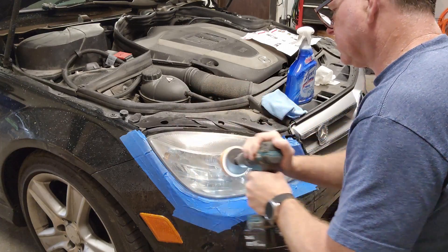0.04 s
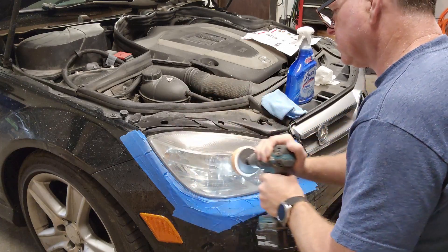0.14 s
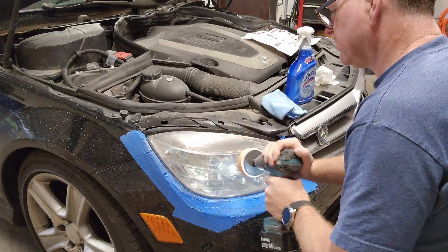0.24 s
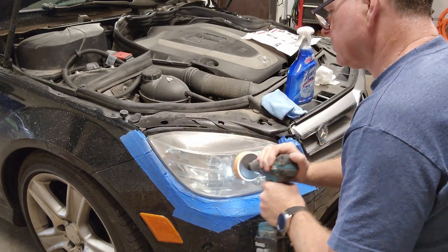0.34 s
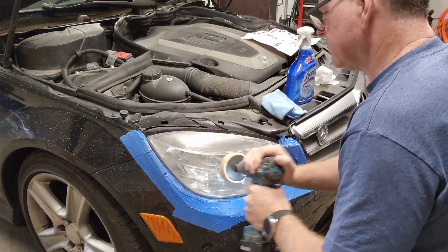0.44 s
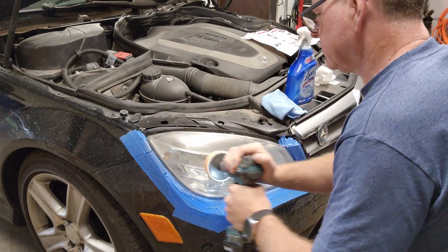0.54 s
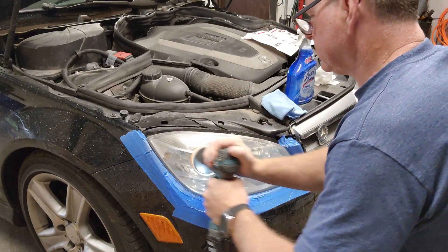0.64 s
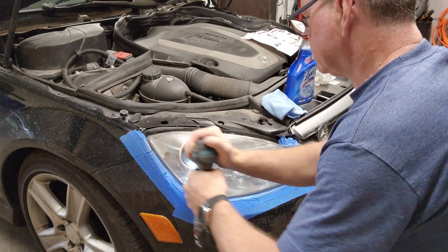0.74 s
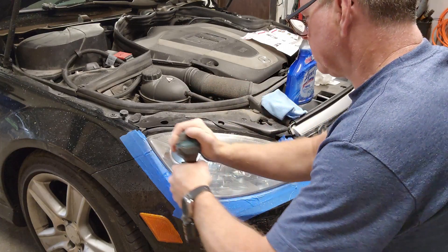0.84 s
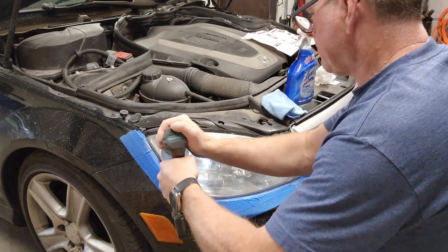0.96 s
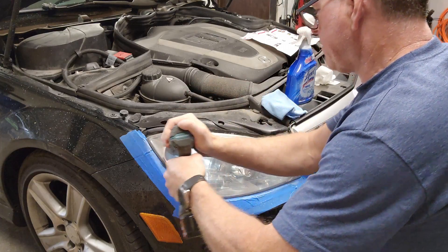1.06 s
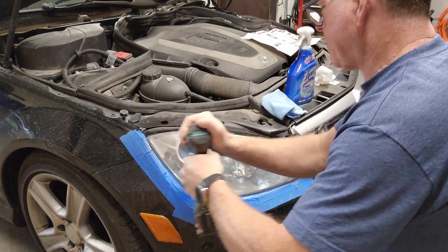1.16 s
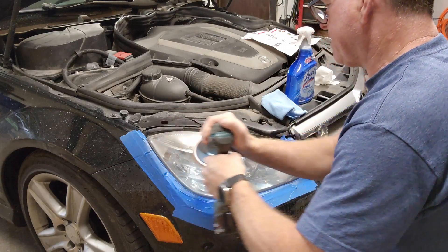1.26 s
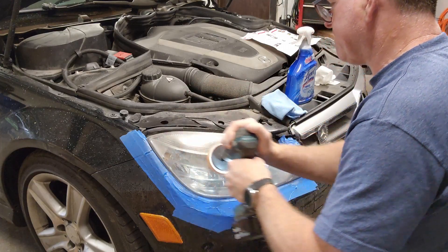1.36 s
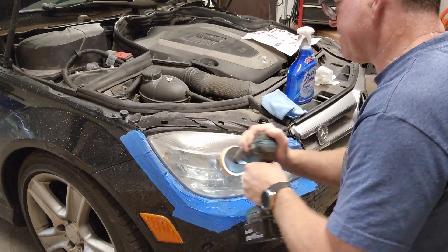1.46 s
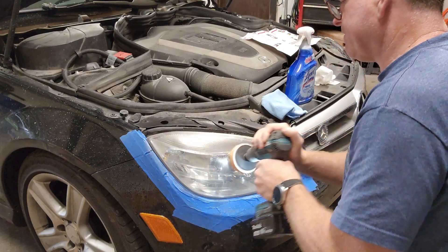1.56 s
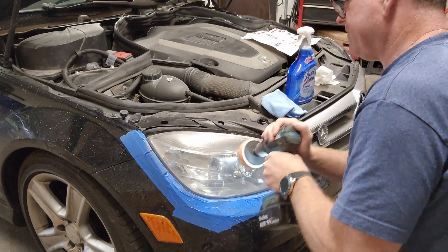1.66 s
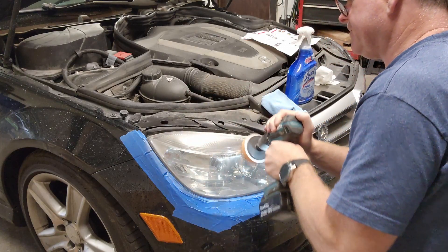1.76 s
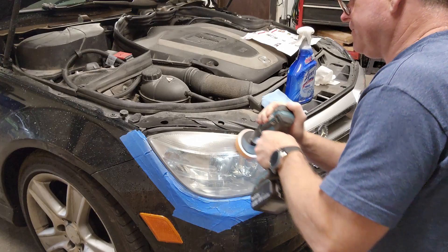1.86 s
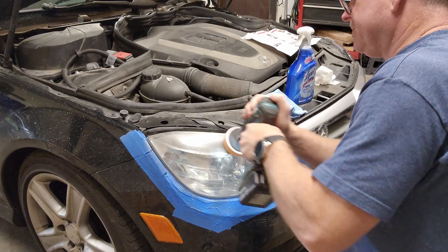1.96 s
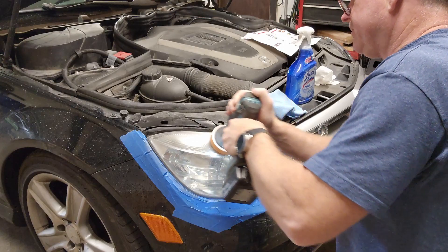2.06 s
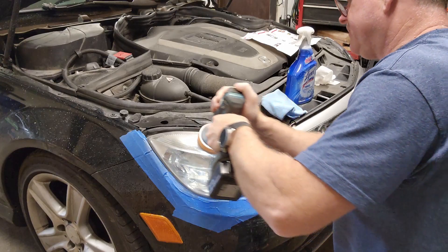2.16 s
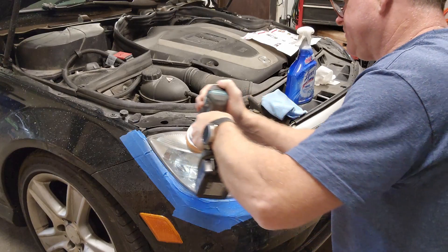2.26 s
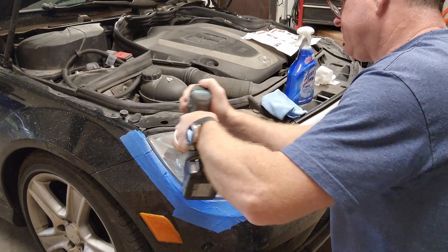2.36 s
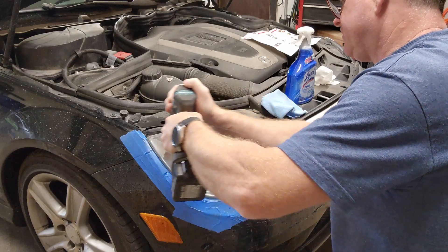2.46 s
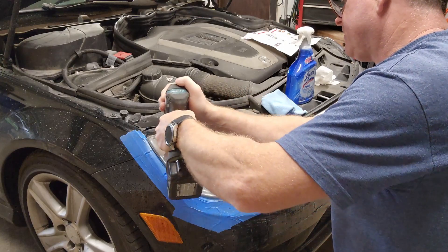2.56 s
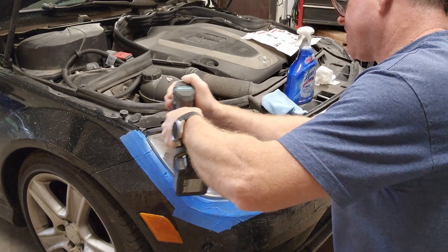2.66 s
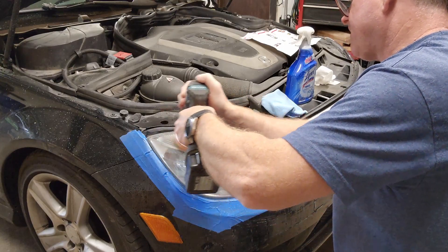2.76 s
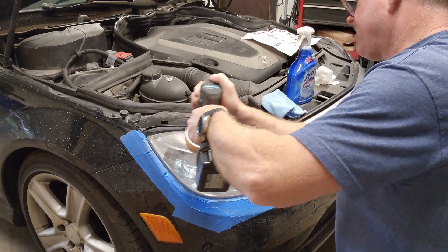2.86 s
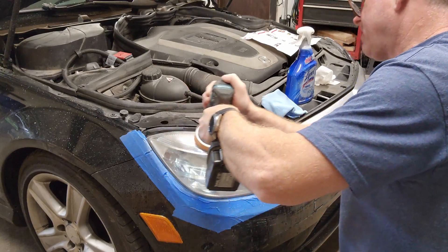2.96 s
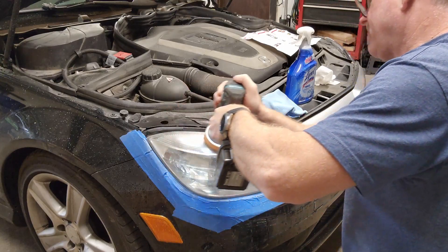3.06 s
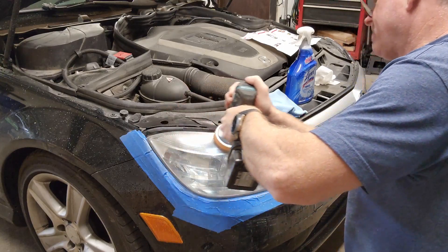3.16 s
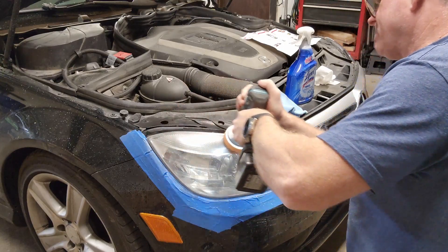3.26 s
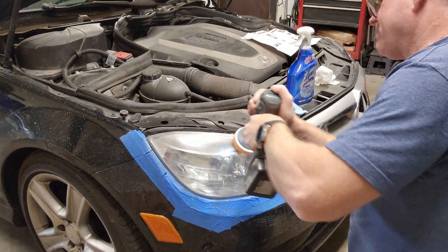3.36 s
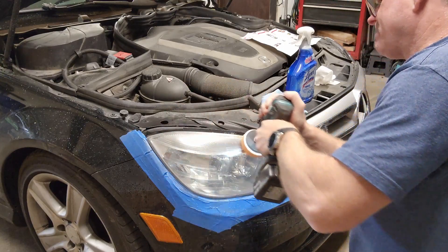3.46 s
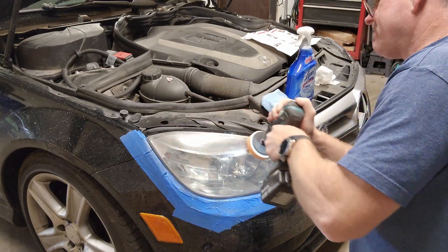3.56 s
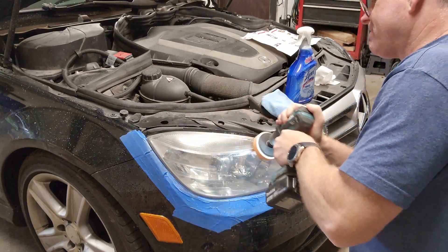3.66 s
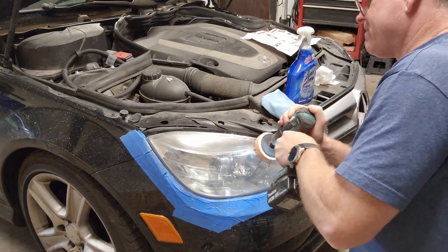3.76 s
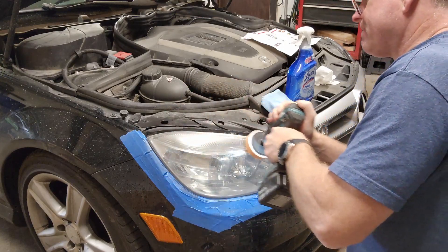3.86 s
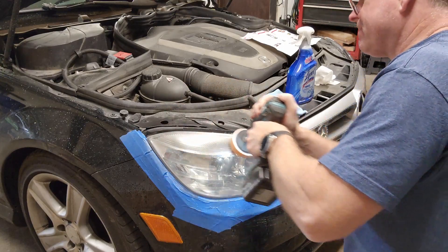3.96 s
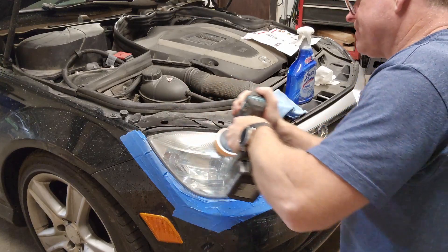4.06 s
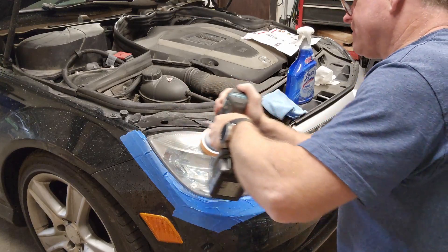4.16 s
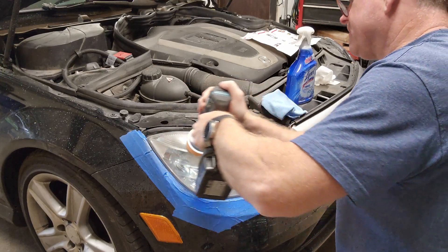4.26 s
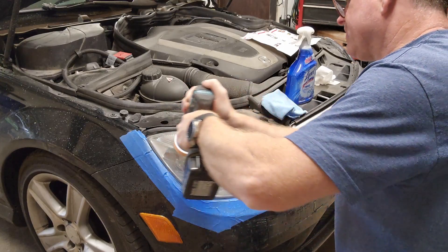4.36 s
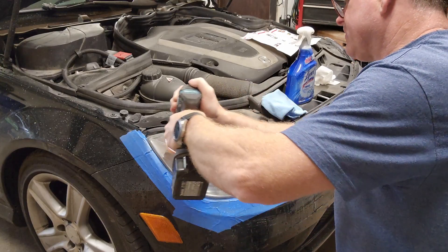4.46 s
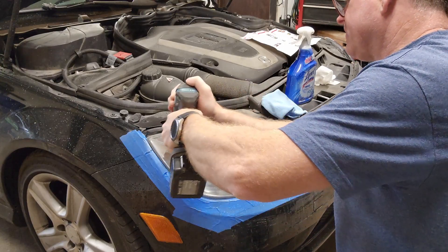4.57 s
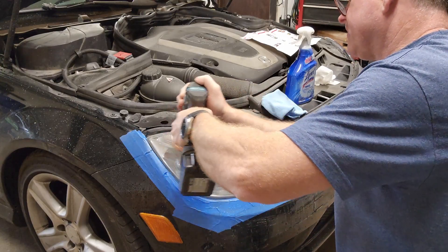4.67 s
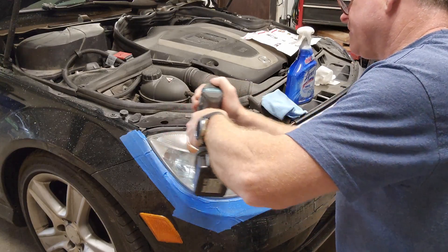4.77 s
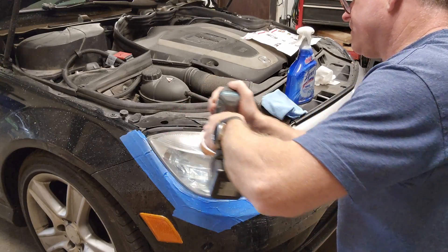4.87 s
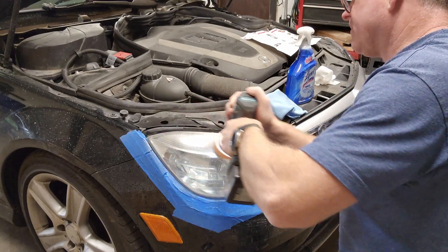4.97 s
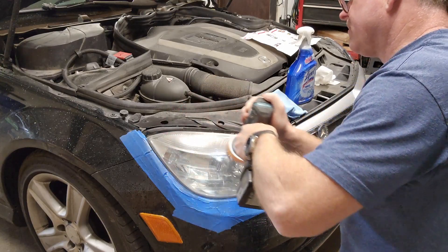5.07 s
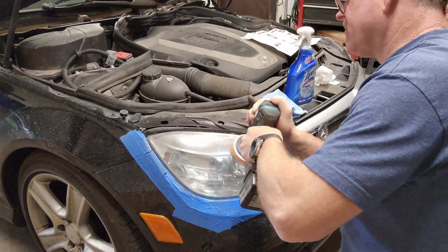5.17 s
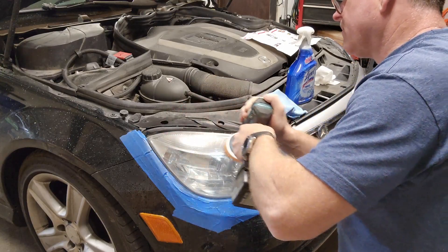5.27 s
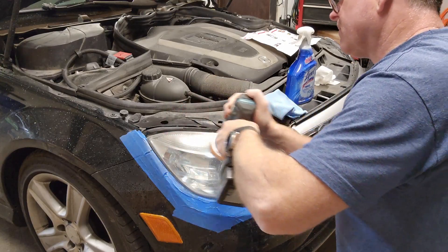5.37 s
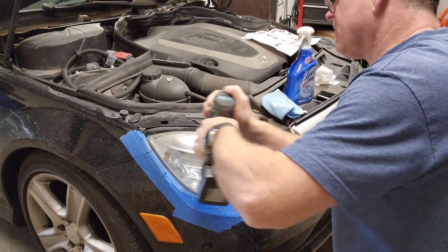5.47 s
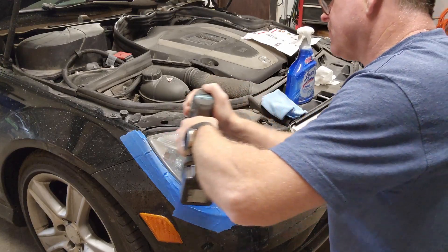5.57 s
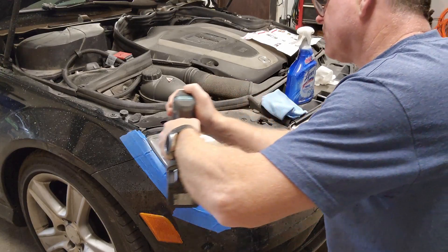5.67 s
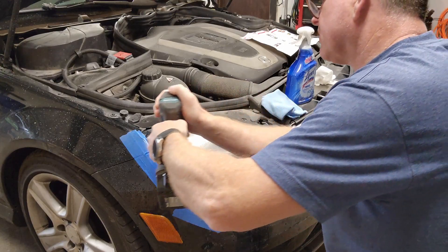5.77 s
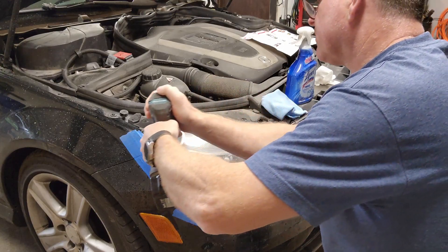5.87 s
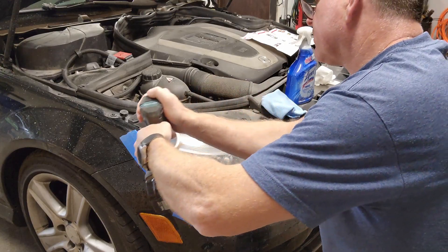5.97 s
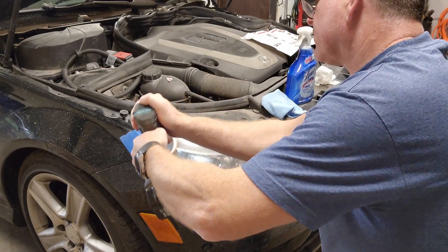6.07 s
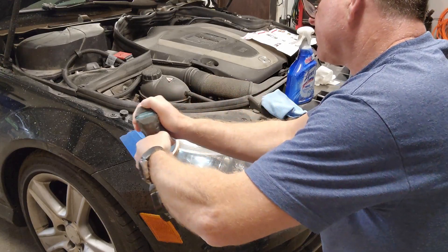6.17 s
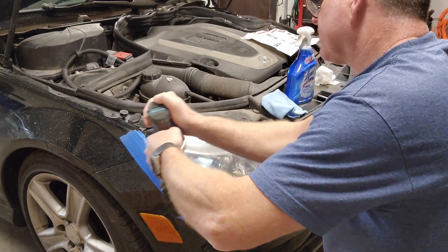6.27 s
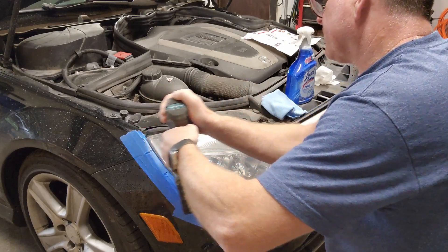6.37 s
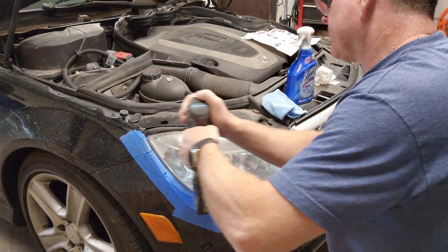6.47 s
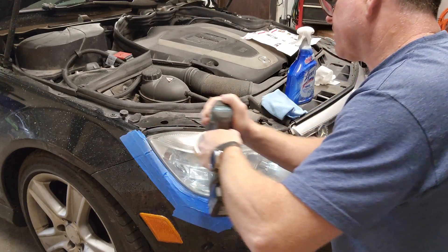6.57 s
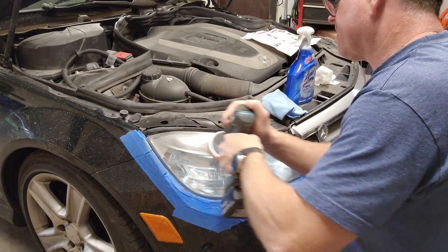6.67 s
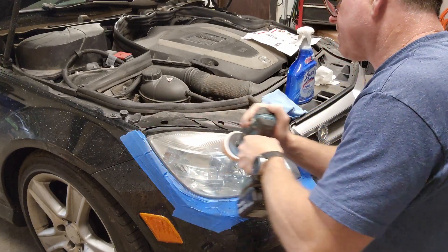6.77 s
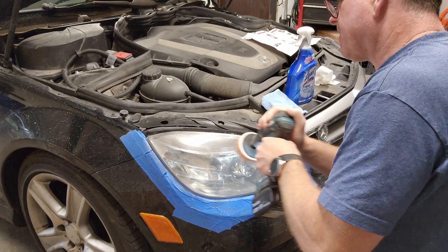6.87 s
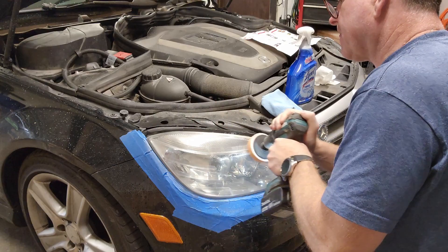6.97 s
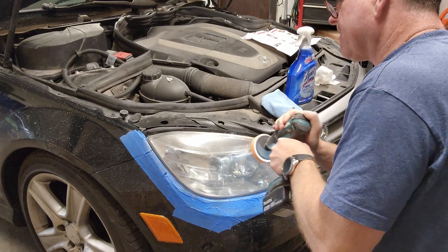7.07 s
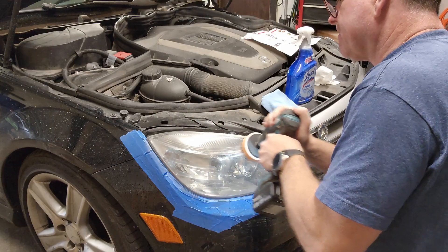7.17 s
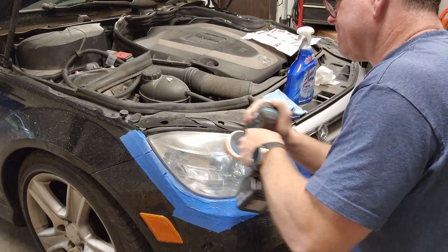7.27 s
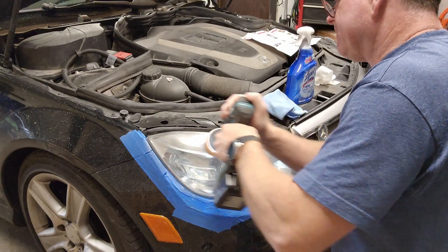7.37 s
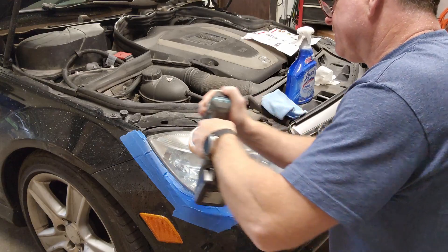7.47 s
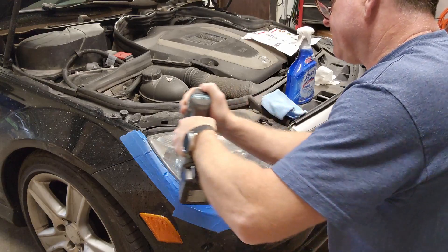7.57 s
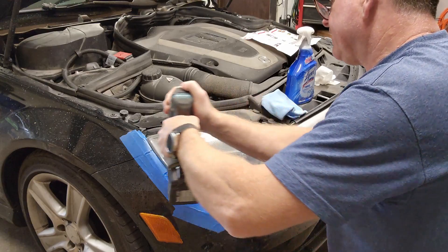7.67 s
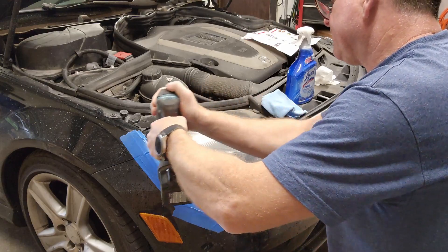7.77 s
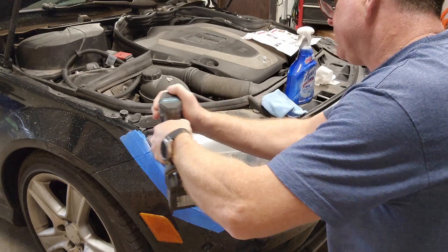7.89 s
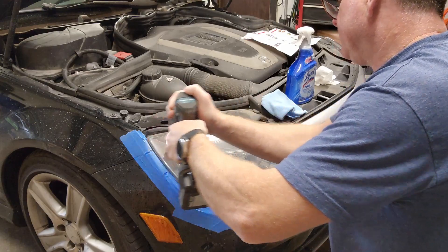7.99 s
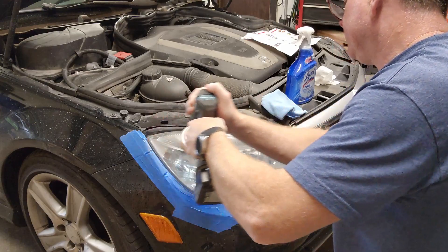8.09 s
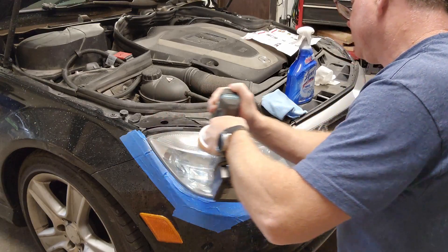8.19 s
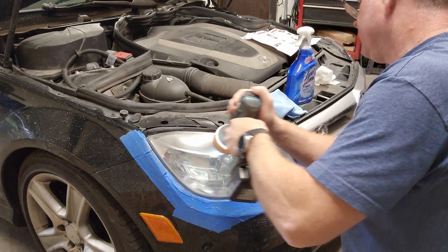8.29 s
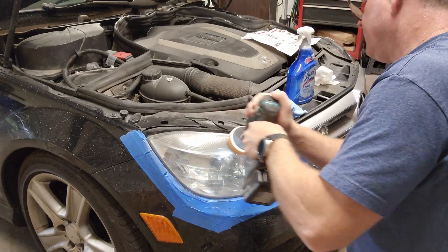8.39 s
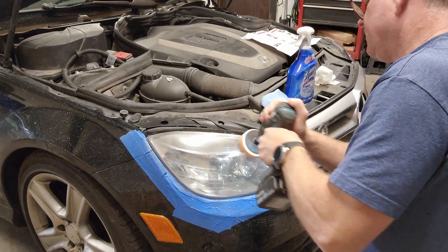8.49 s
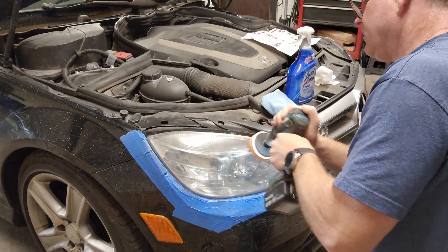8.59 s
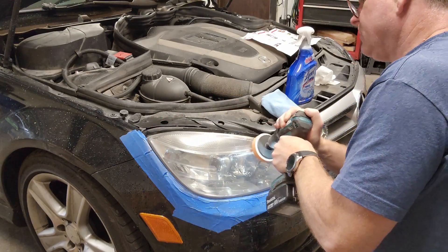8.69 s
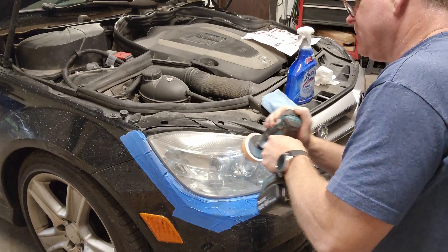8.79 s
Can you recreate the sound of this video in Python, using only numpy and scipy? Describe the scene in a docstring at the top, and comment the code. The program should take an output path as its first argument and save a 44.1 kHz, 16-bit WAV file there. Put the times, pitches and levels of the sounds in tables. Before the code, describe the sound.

A cordless drill whines steadily as its foam pad polishes a plastic headlight, with a swelling gear rattle and brief faint squeals.

```python
"""In a garage, a cordless drill spins a foam pad over a plastic headlight lens, swept to and fro.
Motor and planetary gears whine at fixed multiples of one shaft speed, and the pad throbs on the lens.
Tooth impacts and fan air rush through the housing; friction rings its modes and makes the pad squeal.
The rattle swells as the tool faces the microphones and reaches the right one later at the far end
of each sweep. Near surfaces reflect it, and the room adds a short reverberation."""
import sys
import numpy as np
from scipy import signal
from scipy.fft import rfft, irfft, next_fast_len
from scipy.io import wavfile
from scipy.ndimage import uniform_filter1d, map_coordinates

SR = 44100
rng = np.random.default_rng(int(sys.argv[2]) if len(sys.argv) > 2 else 0)


def master_out(mix):
    """Clip the mix to full scale and print it as 16-bit PCM to the path in sys.argv[1]."""
    frames = np.transpose(np.atleast_2d(mix))
    ceiling = np.clip(frames, -1, 1)
    pcm = np.round(ceiling * 32767).astype(np.int16)
    wavfile.write(sys.argv[1], SR, pcm)


N = 389403
PAD_RATIO = 1 / 16   # pad turns per shaft turn


def amp(db):
    """Decibels to amplitude ratio."""
    return 10 ** (np.asarray(db) / 20)


def rms_one(x):
    """Normalisation to unit rms."""
    return x / np.sqrt(np.mean(x ** 2) + 1e-20)


def in_time(rows):
    """Linear interpolation: one curve for each column after the time."""
    times, *columns = np.transpose(rows)
    return np.array([np.interp(np.arange(N) / SR, times, column) for column in columns])


def at_hz(points, hz):
    """Interpolation of a spectrum on a logarithmic frequency axis."""
    frequencies, levels = np.transpose(points)
    return np.interp(np.log(hz), np.log(frequencies), levels)


def drift(rate_hz, spread_db=None):
    """Random modulation: low-passed noise of unit rms, or a flickering gain if spread_db is given."""
    step, settle = 40, 2000
    r = np.exp(-2 * np.pi * rate_hz * step / SR)
    white = rng.standard_normal(N // step + settle + 2)
    slow = rms_one(signal.lfilter([1], [1, -2 * r, r * r], white)[settle:])
    if spread_db is not None:
        slow = amp(spread_db * slow)
    return np.interp(np.arange(N) / step, np.arange(len(slow)), slow)


def peaked(x, modes):
    """Resonances and antiresonances as second-order filters in cascade."""
    for hz, width_hz, db in modes:
        a, w = amp(db / 2), 2 * np.pi * hz / SR
        q, middle = np.sin(w) * width_hz / hz / 2, -2 * np.cos(w)
        x = signal.lfilter([1 + q * a, middle, 1 - q * a], [1 + q / a, middle, 1 - q / a], x)
    return x


def shaft_tones(turns, lines, flutter_db):
    """Rotational orders: sines at multiples of shaft speed, the higher ones wavering more in phase."""
    out, waver_rad = 0, .045 * drift(20)
    for order, gain in lines:
        phase = 2 * np.pi * (order * turns + rng.random()) + order ** .7 * waver_rad
        out = out + np.sqrt(2) * gain * drift(15.6, flutter_db) * np.sin(phase)
    return out


def rumble(cutoff_hz=45, level_db=-71.5):
    """Low background noise, partly coherent between left and right."""
    mid, side = signal.sosfilt(signal.butter(2, cutoff_hz, fs=SR, output="sos"), rng.normal(size=(2, N)))
    return amp(level_db) * rms_one(mid + amp(-4) * side * [[1], [-1]])


# Response of the reverberant field: frequency_hz, gain_db
GARAGE_RESPONSE = [(60, 17), (250, 2), (600, 6), (1200, 6.5), (2200, 2), (4000, -2), (8000, 0.5),
                   (13000, 15)]

def garage(x, t60_s=.28):
    """Diffuse reverberation: decaying fields blend as the moving tool excites the room from new spots."""
    size, lead = next_fast_len(N + SR), SR // 2
    t, hz = np.arange(lead) / SR, np.linspace(1, SR / 2, size // 2 + 1)
    primed = np.r_[x[lead:0:-1], x]   # the room is already ringing at the start
    spectrum = rfft(primed, size) * amp(at_hz(GARAGE_RESPONSE, hz))
    coherence = .94 / (1 + (hz / 700) ** 1.56)   # long waves reach both microphones alike
    weights = np.array([drift(1.55) for spot in range(5)])
    weights /= np.sqrt(np.sum(weights ** 2, axis=0))
    out = 0
    for weight in weights:
        tail = rng.standard_normal((2, lead)) * amp(-60 * t / t60_s) * (t > .012)
        mid, side = rfft(tail / np.sqrt(2 * np.sum(tail ** 2, axis=1, keepdims=True)), size)
        stereo = np.sqrt(1 + coherence) * mid + np.sqrt(1 - coherence) * side * [[1], [-1]]
        out = out + weight * irfft(spectrum * stereo, size)[:, lead:lead + N]
    return out


# Reflections from bonnet, floor, body and worker: delay_ms, slide_ms_per_ms_of_lag, gain_db
REFLECTIONS = [(1.7, 1, -32), (3.1, -6.0, -5.5), (5.3, 10, 0), (8.9, -12.0, -1.5), (13.7, 15, -3.5)]
# Sweep of the pad, as lag at the right microphone: time_s, lag_ms
PAD_LAG = [(0.0, .115), (.35, .135), (.95, 0.0), (1.15, 0.0), (1.85, .125), (2.55, .01), (2.8, .02),
           (3.85, .135), (4.65, .02), (5.25, .095), (5.75, 0.0), (6.15, -.02), (7.05, .135), (7.8, 0.0),
           (8.83, .135)]

def near_echoes(x):
    """Early reflections: their path lengths slide with the sweep and differ at each microphone."""
    lag_ms, samples, out = in_time(PAD_LAG)[0], np.arange(N), np.zeros((2, N))
    for side in range(2):
        for delay_ms, slide, db in REFLECTIONS:
            path_ms = delay_ms + (slide + .75 * side) * lag_ms + rng.uniform(0, .098)
            out[side] += amp(db) * np.interp(np.abs(samples - path_ms * SR / 1000), samples, x)
    return out


# Wider swing of the motor end, as lag at the right microphone: time_s, lag_ms
MOTOR_LAG = [(0.0, .15), (.4, .21), (.7, .21), (.9, .02), (1.45, .015), (1.7, .04), (1.93, .12),
             (2.2, .065), (2.68, .012), (2.93, .037), (3.2, .095), (3.43, .1), (3.6, .2), (3.93, .175),
             (4.18, .11), (4.4, .04), (4.68, .028), (5.18, .09), (5.43, .07), (5.6, .025), (6.18, -.025),
             (6.68, .065), (7.18, .15), (7.43, .07), (7.93, -.035), (8.18, .045), (8.43, .18), (8.83, .19)]

def direct_sound(pad_end, motor_end):
    """Time difference of arrival: each end of the tool has its own moving lag between left and right."""
    out = 0
    for x, lag in [(pad_end, PAD_LAG), (motor_end, MOTOR_LAG)]:
        late = np.arange(N) - in_time(lag)[0] * SR / 1000
        out = out + np.array([x, map_coordinates(x, [late], order=3, mode="mirror")])
    return out


# Squeals of the pad on the lens: centre_s, length_s, pitch_hz, glide_hz_per_s, level_db
PAD_SQUEALS = [(0.254, .14, 3930, 14, -43), (.72, 0.089, 4220, 210, -37), (1.136, 0.081, 4760, 3, -34),
               (1.148, 0.089, 4970, 495, -47), (1.114, 0.088, 3880, 1486, -43),
               (2.412, 0.38, 2250, 200, -50), (2.56, 0.2, 4270, 250, -34), (2.546, 0.24, 3784, -200, -28.5),
               (2.647, 0.11, 4900, 2, -38), (2.77, 0.072, 4500, 2, -34), (2.952, 0.24, 3580, 107, -35),
               (3.798, 0.23, 4600, -5, -36), (4.715, 0.29, 4230, 198, -52), (5.996, .3, 4780, -2, -45),
               (6.34, 0.14, 4720, 0, -32), (6.36, 0.092, 4920, 2, -38), (6.303, 0.15, 4400, 250, -39),
               (6.68, 0.27, 4490, 600, -31.5), (6.58, 0.1, 2410, 600, -41), (6.757, 0.11, 2330, -200, -39),
               (7.58, 0.16, 2550, -300, -36), (7.91, 0.12, 4290, 6, -36), (8.607, 0.4, 4750, 804, -40)]

def squeals(width_hz=45):
    """Friction-excited vibration: gliding tones, unsteady in level and phase, in Gaussian envelopes."""
    t, out = np.arange(N) / SR, np.zeros(N)
    unsteady = drift(width_hz) + 1j * drift(width_hz)
    for centre_s, length_s, hz, glide, db in PAD_SQUEALS:
        near = np.abs(t - centre_s) < 2 * length_s
        offset_s = t[near] - centre_s
        tone = np.real(unsteady[near] * np.exp(2j * np.pi * (hz + glide * offset_s / 2) * offset_s))
        out[near] += amp(db) * np.exp(-(2 * offset_s / length_s) ** 2) * tone
    return out


# Hollow modes of lens and housing: pitch_hz
HOLLOW_MODES = [1335, 1445, 1600, 1770, 2030, 2200, 2290, 2460, 2560, 2800, 3000, 3160, 3300, 3470, 3610,
                3750, 3860, 4080, 4160, 4305, 4420, 4510, 4630, 4740, 4830]
# Noise spectrum that drives the rings and the rush: frequency_hz, relative_density_db
NOISE_SPECTRUM = [(24, -64), (55, -44), (179, -29), (242, -19), (408, -18.5), (474, -16.5), (908, -23.5),
                  (1970, -8), (2660, -6.5), (3770, -2), (4960, -1), (6210, -11), (7580, -14),
                  (10800, -24.5), (15600, -31)]

def rings(housing_db, width_hz=30):
    """Modal resonance: friction noise drives narrow modes, each swelling and fading at random."""
    white, out = rng.standard_normal((2, N)), 0
    r = np.exp(-np.pi * width_hz / SR)
    for k, hz in enumerate(HOLLOW_MODES):
        mode = signal.lfilter([1, 0, -1], [1, -2 * r * np.cos(2 * np.pi * hz / SR), r * r], white[k % 2])
        out = out + amp(at_hz(NOISE_SPECTRUM, hz)) * drift(10.7, spread_db=4) * mode
    return amp(housing_db - 4.5) * rms_one(out)


# Relative levels: time_s, lens_db, low_rattle_db, housing_db, pad_rub_db, gear_case_db, case_top_db
BAND_SWELLS = [(0.0, -43, -32.5, -25.5, -33, -35, -35), (0.12, -48, -31, -31, -32, -34, -45),
               (0.22, -55, -34, -26, -30, -37, -38), (0.37, -54.5, -33.5, -32.5, -33, -31, -43),
               (0.61, -58, -30, -28.5, -32, -37, -39), (0.73, -48, -29.5, -31.5, -34.5, -38, -32),
               (0.96, -53.5, -29, -32.5, -41, -33, -42), (1.15, -54.5, -29.5, -31, -36, -31, -35),
               (1.37, -54.5, -31.5, -31.5, -39, -35, -47), (1.52, -49, -36, -34.5, -40, -38, -40),
               (1.6, -46, -31.5, -26, -35, -33, -34), (1.67, -51.5, -36.5, -30, -32, -37, -39),
               (2.09, -53.5, -30.5, -29, -32, -39, -42), (2.29, -61, -30.5, -29, -36, -33, -43),
               (2.56, -59, -36, -24, -39.5, -34.5, -35.5), (3.07, -50.5, -33, -28, -31.5, -39, -44.5),
               (3.27, -51, -34.5, -30, -38, -36, -42), (3.46, -55, -37, -29.5, -35, -37, -36),
               (3.79, -48.5, -33, -28, -31, -29, -46), (3.91, -54, -33, -27, -36, -34, -40),
               (4.03, -48, -32.5, -29.5, -31, -40, -41), (4.18, -58, -36, -26, -30, -41, -36),
               (4.33, -59, -29.5, -27.5, -29, -31, -36), (4.52, -58, -36, -27, -33, -39, -43),
               (4.62, -63, -36, -27.5, -31.5, -35, -40), (4.97, -54, -36, -27, -36, -38, -45),
               (5.14, -56.5, -35, -28.5, -30.5, -39, -38), (6.0, -60.5, -33, -27.5, -31, -32, -43.5),
               (6.22, -55, -32, -30, -31, -34, -42), (6.57, -55, -30.5, -32, -30, -36, -43),
               (6.64, -61, -32.5, -28.5, -31, -37, -45), (6.79, -57, -33.5, -31, -34, -30, -35),
               (6.86, -51, -32.5, -30, -29, -42, -42), (7.13, -49, -34.5, -29, -34, -30.5, -39),
               (7.21, -53, -32, -33, -30, -35, -44), (7.38, -60, -36, -28.5, -40, -40, -38),
               (7.6, -58.5, -32.5, -28.5, -28.5, -35.5, -42.5), (8.12, -61.5, -32.5, -29, -34.5, -33, -42),
               (8.36, -56, -30, -29.5, -37, -37, -50), (8.46, -48.5, -33.5, -33, -35, -37, -42),
               (8.71, -53.5, -35, -33, -32, -31, -41), (8.83, -53, -33, -29, -33, -33, -39)]
# Rasp of the pad: time_s, relative_level_db
RASP_SWELL = [(0.0, -34), (0.19, -35), (0.59, -34), (1.3, -34.5), (1.7, -39), (2.58, -35), (3.69, -39.5),
              (4.5, -37), (5.26, -37), (6.81, -31.5), (6.91, -42), (7.21, -30.5), (7.23, -42.5),
              (7.43, -30), (7.5, -42), (7.6, -33), (7.94, -39), (8.02, -36), (8.43, -36.5), (8.83, -32)]

def band_levels():
    """Directivity: the levels of ten noise bands, low to high, change as the tool turns."""
    lens, low_rattle, housing, rub, case, top = in_time(BAND_SWELLS)
    rasp = in_time(RASP_SWELL)[0]
    panel, vents, fan = .034 * low_rattle, -.37 * housing, -.046 * housing
    return np.array([lens, panel, low_rattle, rasp, housing, rub, case, top, vents, fan])


# The ten bands, from lens to fan: centre_hz
BAND_CENTRES = [330, 750, 2100, 2850, 3700, 4300, 4750, 5500, 6600, 13000]
# Main resonances and dips of the housing: centre_hz, width_hz, gain_db
HOUSING_MODES = [(848, 172, 8), (898, 89, -5), (1010, 157, 7), (678, 49, -4.5), (1395, 62, 2.5),
                 (1500, 150, 1), (2173, 900, 5.5), (2840, 1400, 0.5), (3822, 850, 6.5), (7660, 2260, 8)]
# Narrow peaks and valleys of the body: centre_hz, width_hz, gain_db
BODY_MODES = [(560, 90, 1.5), (790, 45, 4), (905, 45, -5), (1600, 45, 3), (1875, 60, -3), (4305, 50, 2),
              (5230, 120, -3)]

def rush(turns, bands_db, steady_db=-25.5):
    """Source and filter: tooth impacts and air as noise through the housing, swelling and steady."""
    throb = 1 + .05 * np.sin(2 * np.pi * PAD_RATIO * turns)
    grains = rng.standard_normal((2, N)) * drift(69, spread_db=1.5) * throb
    edges_hz = 25 * 2 ** np.arange(0, 9.6, 1 / 6)
    mean_db = 10 * np.log10(np.mean(amp(2 * bands_db), axis=1, keepdims=True))
    swells_db = bands_db - mean_db + .72 * drift(38)
    swelling, steady = 0, 0
    for k, (low, high) in enumerate(zip(edges_hz, edges_hz[1:])):
        hz = np.sqrt(low * high)
        bandpass = signal.butter(2, [low, high], "band", fs=SR, output="sos")
        band = amp(at_hz(NOISE_SPECTRUM, hz)) * signal.sosfilt(bandpass, grains[k % 2])
        place = np.interp(np.log(hz), np.log(BAND_CENTRES), np.arange(10))
        below = min(int(place), 8)
        swell_db = (1 - place + below) * swells_db[below] + (place - below) * swells_db[below + 1]
        depth = min(hz / 130, 1) ** 2   # the deep bass hardly swells
        swelling = swelling + band * amp(swell_db * depth) * drift(13.7, spread_db=1.5)
        steady = steady + band
    swelling, steady = peaked(np.array([swelling, steady]), HOUSING_MODES + BODY_MODES)
    gain = amp(steady_db) / np.std(steady)
    return gain * swelling, gain * steady


# Sidebands of the gears: shaft_order, level_re_housing_db
GEAR_SIDEBANDS = [(3.0, -33), (4.711, -24), (5.25, -28), (7.227, -23), (7.43, -20), (7.836, -20),
                  (9.75, -24), (12.0, -32), (16.0, -33), (20.32, -43)]

def gear_whine(turns, housing_db):
    """Gear-mesh sidebands: fluttering tones that follow the level of the housing's rattle."""
    lines = [(order, amp(housing_db + db)) for order, db in GEAR_SIDEBANDS]
    return shaft_tones(turns, lines, flutter_db=3)


# Strong throbs, loudest where the lens drums: time_s, pad_order_4_db, pad_order_8_db, pad_order_15_db
STRONG_THROBS = [(0.1, -73, -57, -57), (0.37, -60, -57, -68), (0.64, -71, -91, -62), (0.91, -68, -79, -61),
                 (1.18, -74, -72, -64), (1.45, -69, -61, -50), (1.72, -70, -57, -47), (1.99, -69, -50, -75),
                 (2.26, -69, -84, -72.0), (2.53, -72, -67, -72), (2.8, -75, -67, -84),
                 (3.07, -89, -54, -70), (3.34, -59, -51.0, -59), (3.61, -63, -57.5, -52),
                 (3.88, -62, -53, -68), (4.15, -71.0, -65, -79), (4.42, -81.0, -70, -76.0),
                 (4.69, -88, -66, -80.0), (4.96, -82, -71, -78), (5.23, -62, -54, -56),
                 (5.5, -91, -65, -81), (5.77, -86, -92, -84), (6.04, -68, -63, -76), (6.31, -102, -67, -83),
                 (6.58, -62, -74, -78.0), (6.85, -73, -60, -64), (7.12, -81, -52, -62),
                 (7.39, -69, -69, -67), (7.66, -76, -74, -70), (7.93, -77, -76, -66),
                 (8.2, -71, -64, -83.0), (8.47, -71, -52.5, -75), (8.74, -74, -57, -65)]
# Weak throbs that follow the lens band: pad_order, relative_level_db
WEAK_THROBS = [(5, -22), (6, -25), (7, -22), (9, -19), (10, -21), (11, -21), (12, -19), (14, -23),
               (17, -20), (18, -21)]

def pad_throb(turns, lens_db):
    """Forced vibration: the pad drives the lens at multiples of its own rotation rate."""
    strong = zip(PAD_RATIO * np.array([4, 8, 15]), amp(in_time(STRONG_THROBS)))
    weak = [(order * PAD_RATIO, amp(lens_db + 3.5 + db)) for order, db in WEAK_THROBS]
    return shaft_tones(turns, strong, flutter_db=1.5) + shaft_tones(turns, weak, flutter_db=4)


# Relative levels of the motor's tones: time_s, shaft_db, poles_db, pole_octave_db, mesh_db
MOTOR_LEVELS = [(0.1, -48.0, -34.0, -49.0, -45.0), (0.3, -48.0, -39.0, -39.0, -40.0),
                (0.5, -49.0, -36.0, -42.0, -38.0), (0.7, -48.0, -50.0, -42.0, -40.0),
                (0.9, -51.0, -38.0, -40.0, -34.0), (1.1, -55.0, -41.0, -38.0, -36.0),
                (1.3, -51.0, -43.0, -43.0, -43.0), (1.5, -49.0, -41.0, -48.0, -43.0),
                (1.7, -47.0, -38.0, -44.0, -45.0), (1.9, -57.0, -45.0, -42.0, -48.0),
                (2.1, -62.0, -47.0, -39.0, -43.0), (2.3, -56.0, -36.0, -37.0, -38.0),
                (2.5, -58.0, -44.0, -36.0, -32.0), (2.7, -58.0, -41.0, -33.0, -34.0),
                (2.9, -57.0, -43.0, -37.0, -32.0), (3.1, -55.0, -41.0, -34.0, -39.0),
                (3.3, -62.0, -40.0, -35.0, -41.0), (3.5, -63.0, -47.0, -36.0, -46.0),
                (3.7, -56.0, -45.0, -35.0, -36.0), (3.9, -53.0, -43.0, -37.0, -37.0),
                (4.1, -59.0, -44.0, -38.0, -36.0), (4.3, -60.0, -42.0, -32.0, -32.0),
                (4.5, -55.0, -41.0, -38.0, -36.0), (4.7, -56.0, -40.0, -35.0, -33.0),
                (4.9, -60.0, -42.0, -36.0, -35.0), (5.1, -61.0, -44.0, -36.0, -36.0),
                (5.3, -55.0, -46.0, -37.0, -34.0), (5.5, -62.0, -42.0, -37.0, -32.0),
                (5.7, -58.0, -39.0, -36.0, -35.0), (5.9, -59.0, -34.0, -36.0, -41.0),
                (6.1, -59.0, -43.0, -36.0, -37.0), (6.3, -59.0, -39.0, -38.0, -40.0),
                (6.5, -58.0, -36.0, -37.0, -38.0), (6.7, -61.0, -39.0, -39.0, -37.0),
                (6.9, -49.0, -43.0, -36.0, -42.0), (7.1, -53.0, -43.0, -40.0, -46.0),
                (7.3, -54.0, -42.0, -39.0, -45.0), (7.5, -60.0, -36.0, -38.0, -36.0),
                (7.7, -60.0, -46.0, -35.0, -37.0), (7.9, -58.0, -44.0, -32.0, -35.0),
                (8.1, -58.0, -39.0, -37.0, -41.0), (8.3, -65.0, -44.0, -35.0, -45.0),
                (8.5, -54.0, -40.0, -42.0, -44.0), (8.7, -51.0, -49.0, -48.0, -39.0)]

def motor_whine(turns, pole_order=4, mesh_order=10.562, slot_order=24):
    """Periodic forcing by shaft, poles, gear teeth and slots; the poles' octave is returned apart."""
    shaft, poles, octave, mesh = amp(in_time(MOTOR_LEVELS))
    lines = [(1, shaft), (pole_order, .8 * poles), (mesh_order, 1.15 * mesh), (slot_order, amp(-51))]
    whine = shaft_tones(turns, lines, flutter_db=1.5)
    return whine, shaft_tones(turns, [(2 * pole_order, 1.15 * octave)], flutter_db=1.5)


# Motor shaft under load: time_s, speed_turns_per_s
SHAFT_SPEED = [(0.0, 489.5), (0.08, 488.9), (0.16, 485.5), (0.32, 483.9), (0.64, 488.6), (0.8, 485.5),
               (1.04, 484.6), (1.12, 484.6), (1.28, 488.6), (1.36, 486.2), (1.52, 487.0), (1.6, 485.6),
               (1.68, 487.4), (1.76, 486.5), (1.92, 488.9), (2.32, 486.7), (2.4, 487.4), (2.64, 485.1),
               (2.72, 487.7), (2.8, 488.6), (3.04, 484.9), (3.36, 482.3), (3.68, 484.8), (3.76, 484.4),
               (3.84, 482.3), (4.08, 486.9), (4.24, 484.3), (4.48, 483.7), (4.72, 488.2), (4.8, 487.5),
               (5.04, 482.2), (5.12, 481.2), (5.2, 482.4), (5.36, 479.8), (5.68, 487.4), (5.76, 488.2),
               (6.0, 487.6), (6.16, 484.0), (6.32, 488.9), (6.4, 489.5), (6.56, 484.9), (6.64, 485.6),
               (6.88, 484.1), (7.12, 481.2), (7.28, 481.4), (7.44, 485.9), (7.6, 487.0), (7.84, 482.5),
               (7.92, 482.1), (8.0, 482.7), (8.16, 487.6), (8.24, 485.9), (8.4, 484.9), (8.64, 485.5),
               (8.72, 484.8), (8.8, 482.5)]

def shaft_turns():
    """Rotation is the integral of speed, which hunts as the pad grabs and slips."""
    hunt = .9 * drift(rate_hz=7)
    speed = in_time(SHAFT_SPEED)[0] + hunt - uniform_filter1d(hunt, size=SR // 3)
    return np.cumsum(speed) / SR


def scene():
    """Superposition of the tool's direct sound, early reflections, reverberation and low noise."""
    turns, bands_db = shaft_turns(), band_levels()
    lens_db, housing_db = bands_db[0], bands_db[4]
    motor, pole_octave = motor_whine(turns)
    pad = pad_throb(turns, lens_db) + pole_octave   # the octave radiates from the pad end
    gears = gear_whine(turns, housing_db)
    swelling, steady = rush(turns, bands_db)
    rattle = amp(-5) * swelling + gears + rings(housing_db) + squeals()
    room_feed = .2 * steady + .8 * swelling + amp(-11) * motor + amp(-13) * pad
    return direct_sound(rattle + pad, motor) + near_echoes(rattle) + garage(room_feed) + rumble()


# Dip in the microphone's treble: centre_hz, width_hz, gain_db
TREBLE_DIP = [(11000, 900, -4)]

def record(dry, cutoff_hz=15700):
    """Frequency response of the microphone: a treble dip, then a steep low-pass."""
    lowpass = signal.ellip(12, .5, 65, cutoff_hz, fs=SR, output="sos")
    return signal.sosfilt(lowpass, peaked(dry, TREBLE_DIP))


dry = scene()
out = record(dry)
master_out(out)
```